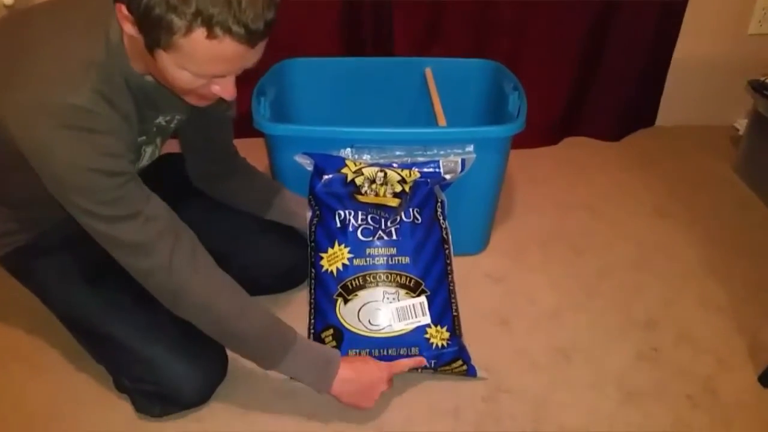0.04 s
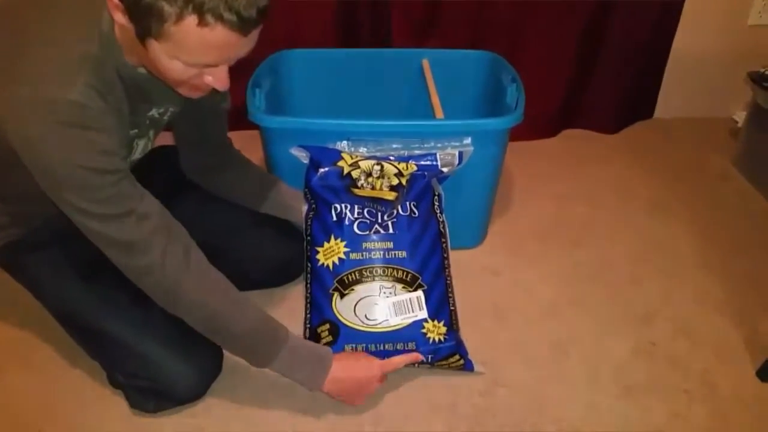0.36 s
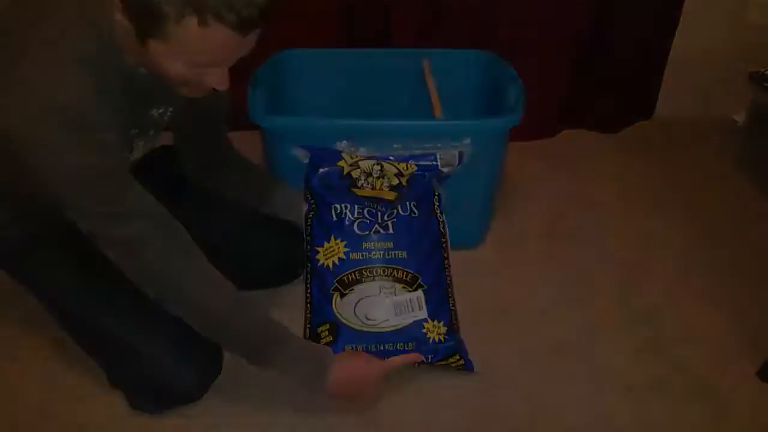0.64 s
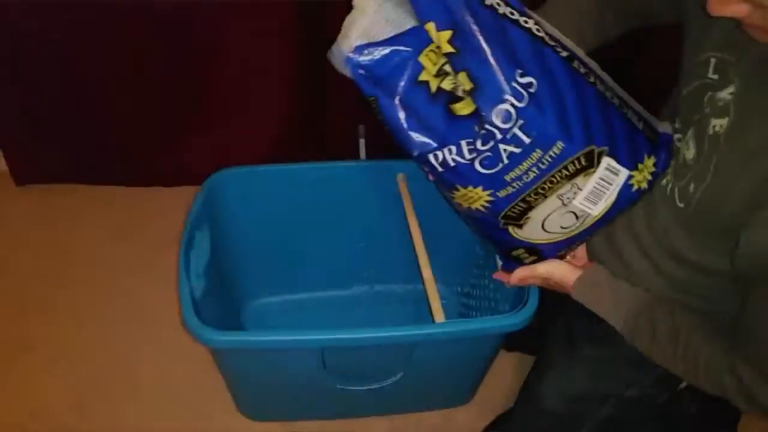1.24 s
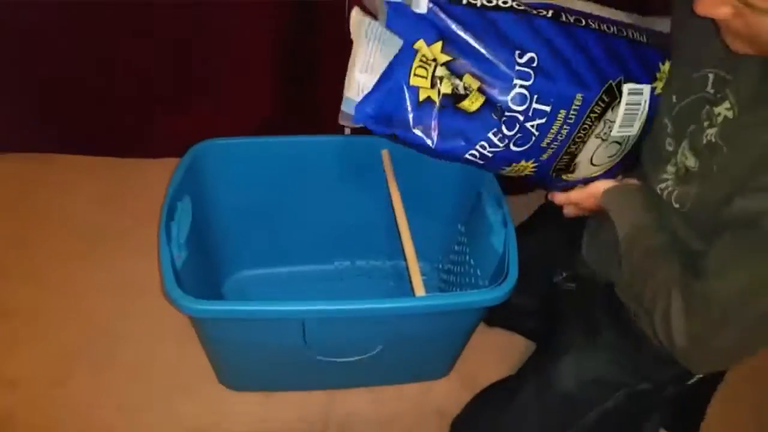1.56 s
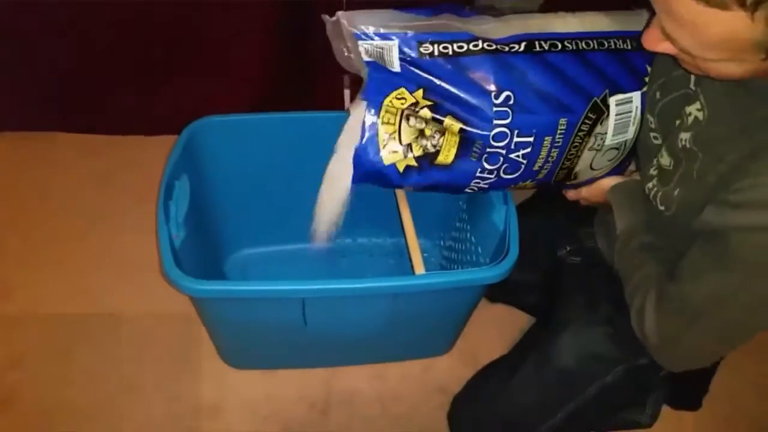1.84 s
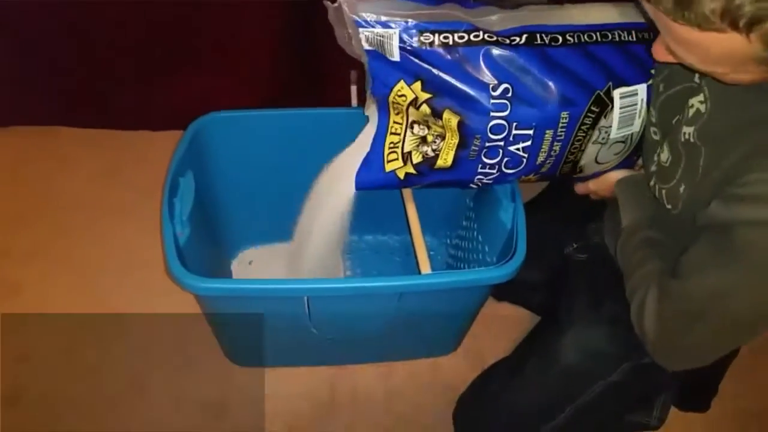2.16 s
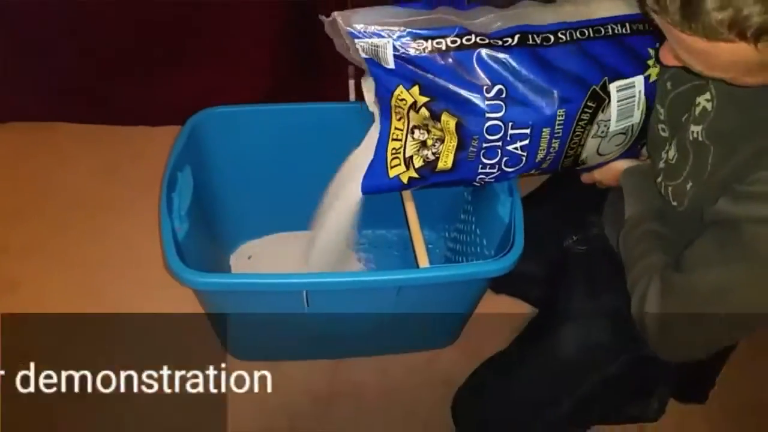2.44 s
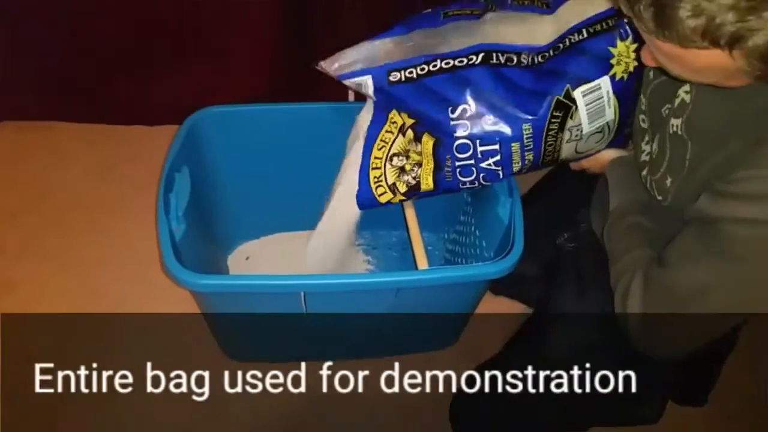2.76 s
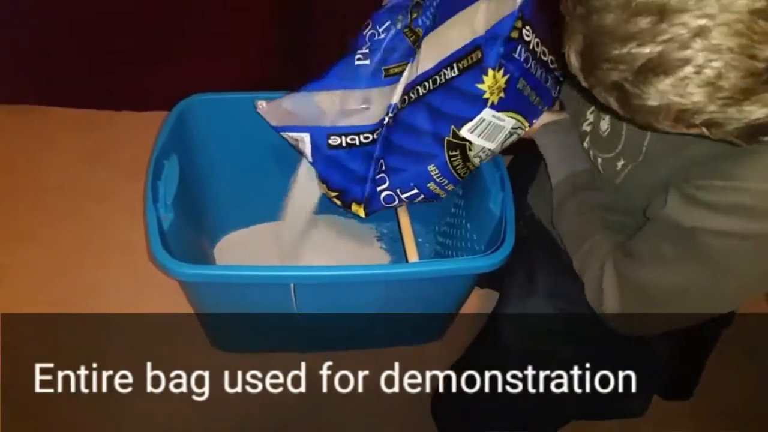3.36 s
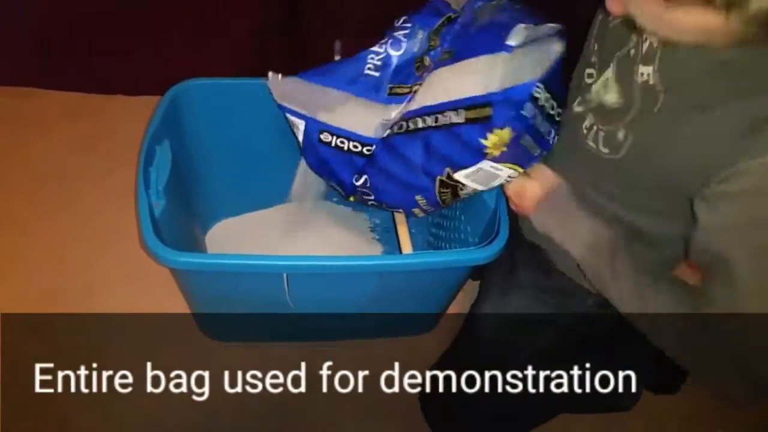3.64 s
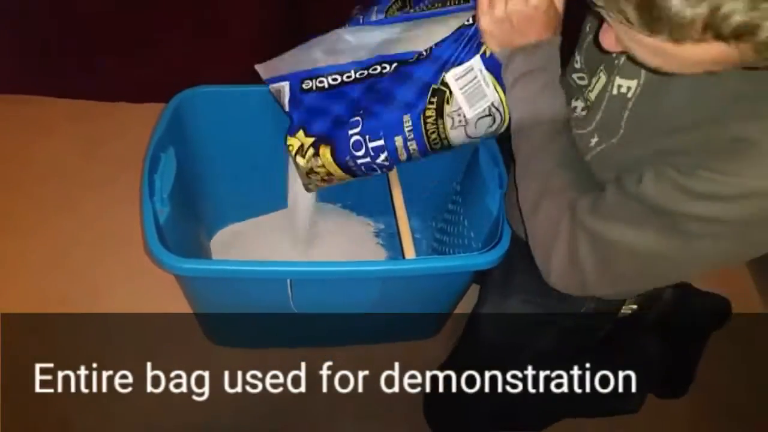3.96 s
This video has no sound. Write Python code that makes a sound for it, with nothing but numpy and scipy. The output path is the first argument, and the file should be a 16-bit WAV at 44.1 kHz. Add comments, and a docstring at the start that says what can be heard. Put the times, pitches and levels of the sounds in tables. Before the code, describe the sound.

Granular litter streams into a plastic tub, hissing and pattering, as its bag crinkles.

```python
"""A low rumble and soft knocks: fingers hold and bump a hand-held recorder in a carpeted room.
A plastic bag crinkles, and cat litter slides twice inside it as it tilts.
The litter streams into a plastic tub, hissing, pattering and drumming on the bare floor until a heap
damps it. After one more slide, the bag crinkles in bursts of snaps as it is shaken empty."""
import sys
import numpy as np
from scipy import signal
from scipy.fft import rfft, irfft
from scipy.io import wavfile
from scipy.ndimage import uniform_filter1d

SR = 44100
rng = np.random.default_rng(int(sys.argv[2]) if len(sys.argv) > 2 else 0)


def wav_out(sig):
    """Save sig, one row per channel (or a flat mono array), as 16-bit PCM at SR to the path in sys.argv[1]."""
    wavfile.write(sys.argv[1], SR, np.round(np.clip(np.atleast_2d(sig).T, -1, 1) * 32767).astype(np.int16))


N = 176400
T = np.arange(N) / SR
GRAINS_PER_S, GRAIN_SPREAD_DB = 29000, 3


def amp(db):
    """dB to gain."""
    return 10 ** (np.asarray(db) / 20)


def unit(x):
    """Scale to rms 1."""
    return x / np.sqrt(np.mean(x ** 2) + 1e-20)


def curve(rows, column=1):
    """Gain over time from a dB column; silent before the first row."""
    rows = np.array(rows)
    return amp(np.interp(T, rows[:, 0], rows[:, column])) * (T >= rows[0, 0])


def read(rows, hz, column=1):
    """Interpolate a column over log frequency."""
    rows = np.array(rows)
    return np.interp(np.log(hz + 1), np.log(rows[:, 0] + 1), rows[:, column])


def colour(x, rows, column=1, size=4096):
    """Minimum-phase filter with the given spectrum."""
    log_gain = np.log(amp(read(rows, abs(np.fft.fftfreq(size, 1 / SR)), column)))
    taps = np.fft.ifft(np.exp(np.conj(signal.hilbert(log_gain)))).real[:size // 2]
    return signal.oaconvolve(x, taps[None], axes=1)[:, :x.shape[1]]


def grains(per_s, spread_db, size=N, mic_jitter_s=0.00007):
    """Tiny random impacts, each slightly early or late at the right microphone."""
    hits = (rng.random(size) < per_s / SR) * rng.choice([-1., 1.], size)
    hits *= amp(spread_db * np.minimum(rng.exponential(1, size), 5))
    arrival = np.arange(size) + np.round(rng.standard_normal(size) * mic_jitter_s * SR).astype(int)
    return unit(np.array([hits, np.bincount(arrival % size, hits, size)]))


def noise(spectrum):
    """Coloured stereo noise, rms 1."""
    return unit(colour(rng.standard_normal((2, N)), spectrum))


def grip(right_db=-8):
    """The holding hand rumbles, mostly on the left microphone."""
    # rumble spectrum: (frequency [Hz], level [dB])
    spectrum = [(20, -16.5), (60, 1), (110, -0.5), (200, -4.5), (330, -16.5), (500, -28.5), (1200, -62.5)]
    # rumble envelope: (time [s], level [dB])
    envelope = [(0, -51.5), (.07, -70), (.23, -65.5), (.3, -74), (.72, -79), (.86, -63), (.97, -70),
                (1.05, -53), (1.15, -65.5), (1.31, -63.5), (1.42, -55), (1.56, -61.5), (1.8, -63),
                (3.3, -63), (3.55, -48), (3.72, -74), (4.0, -48)]
    return noise(spectrum) * curve(envelope) * amp([[0], [right_db]])


def room_tone(left_db=-71, right_db=-75):
    """Steady low rumble and thin hiss; faint airy hiss at the start."""
    # steady spectrum: (frequency [Hz], level [dB])
    tone = [(20, -20), (35, 12.5), (110, -1), (200, -7.5), (350, -8.5), (460, -27), (700, -27.5),
            (3200, -43.5), (3800, -23.5), (4500, -41.5), (12000, -50.5)]
    # airy spectrum: (frequency [Hz], level [dB])
    air = [(200, 8), (700, -3), (2000, -8.5), (3000, -13.5), (4200, -10), (5500, -22), (12000, -19.5)]
    # airy envelope: (time [s], level [dB])
    air_envelope = [(0, -75), (.08, -83.5), (.38, -85.5), (.45, -110)]
    return noise(tone) * amp([[left_db], [right_db]]) + noise(air) * curve(air_envelope)


def finger_bumps(bass_cut_hz=81):
    """A pressure push on one microphone swings back through its bass cut; slow pushes are rounder."""
    # finger contacts: (time [s], peak [dB], nominal rise [ms], left minus right [dB])
    bumps = [(.219, -51, 2.6, 25), (0.236, -53, 2.5, 12), (.325, -54.5, 1.9, 22), (.369, -47, 2.5, 38),
             (.537, -35, 2.25, 31), (0.623, -46, 2.8, -15), (0.796, -41, 2.45, 27), (0.836, -48.5, 3.2, 13),
             (0.926, -41.5, 3.2, 23), (1.459, -29, 2.13, 25), (1.48, -42, 2.4, 17), (1.497, -44, 2.7, 20),
             (1.520, -39.5, 2, 32), (1.622, -37.5, 3.4, 30), (1.7094, -23.5, 1.63, 28),
             (2.243, -44, 3.7, 29), (3.142, -37, 2.9, 19), (3.395, -11.5, 0.53, 35), (3.527, -28.5, 2, 23),
             (3.5819, -21, 0.78, 33), (3.6252, -26, 1.4, 32)]
    out, t = np.zeros((2, N)), T[:SR // 12]
    bass_cut = signal.butter(2, bass_cut_hz, "high", fs=SR)
    for time_s, peak_db, rise_ms, side_db in bumps:
        roundness = 1 + 0.5 * rise_ms ** 2
        peak_s = rise_ms / 1000 * np.sqrt(roundness / 2)
        push = -(t / peak_s * np.exp(1 - t / peak_s)) ** roundness
        swing = signal.lfilter(*bass_cut, push)
        gains = amp(peak_db + np.minimum([[side_db], [-side_db]], 0))
        add(out, time_s - peak_s, gains * swing / abs(swing).max())
    return out


def bag_crinkles(attack_share=0.15, release_s=0.0047):
    """Each fold gives way in a burst of snaps, with a dull thud as the load shifts."""
    # folds: (time [s], length [s], crackle [dB], brightening at 8 kHz [dB], thud [dB])
    folds = [(0.875, 0.016, -83, -10, -78.5), (0.943, 0.0075, -76.5, -15, -83),
             (1.02, 0.037, -74, -17, -66), (1.088, 0.0081, -59, -25, -60), (1.109, 0.0076, -40, -10, -51),
             (1.3281, 0.0053, -45, -1, -38.5), (1.342, 0.046, -59.5, -14, -51),
             (1.397, 0.027, -55.5, -12, -46), (1.474, 0.065, -71, -8, -61), (2.436, 0.023, -42.5, -30, -52),
             (2.624, 0.011, -52, 6, -40), (2.928, 0.019, -38.5, -16, -42), (2.96, 0.015, -40, 10.5, -36.5),
             (3.073, 0.01, -39, -2, -64), (3.332, 0.013, -52, -8, -41), (3.487, 0.091, -46.5, 3, -43.5),
             (3.543, 0.0073, -24.5, 0, -30), (3.636, 0.0034, -33.5, -55, -41), (3.67, 0.027, -52.5, 0, -46),
             (3.733, 0.018, -38, -3, -44.5), (3.758, 0.0084, -29.5, -23, -40),
             (3.773, 0.014, -41.5, 13, -56), (3.803, 0.0025, -22.5, -2, -30), (3.812, 0.03, -40, -3, -41.5),
             (3.841, 0.011, -32, 7, -43), (3.873, 0.017, -34.5, -5, -35), (3.899, 0.017, -36.5, -5, -36),
             (3.954, 0.0099, -39.5, 4, -65)]
    # plastic film spectrum: (frequency [Hz], level [dB])
    film = [(60, -6.5), (250, 0), (600, 2), (1100, 6.5), (1800, 4.5), (2700, -4.5), (4100, 0.5),
            (5400, -10.5), (7500, -0.5), (10000, -5.5), (11700, -26.5)]
    # thud spectrum: (frequency [Hz], level [dB])
    sag = [(30, -25), (90, -0.5), (180, 10.5), (340, 5), (480, -9.5), (700, -2.5), (1500, -33), (4000, -59)]
    out, t = np.zeros((2, N)), T[:SR // 7]
    for time_s, length_s, crackle_db, bright_db, thud_db in folds:
        attack = np.minimum(t / (attack_share * length_s), 1)
        decay = np.exp(-np.maximum(t - length_s, 0) / release_s - 0.46 * t / length_s)
        snaps = grains(per_s=9000, spread_db=1.8, size=len(t)) * attack * decay
        crackle = amp(crackle_db) * colour(unit(colour(snaps, film)), [(1800, 0), (8000, bright_db)])
        thud = amp(thud_db) * unit(colour(snaps, sag))
        add(out, time_s, np.sqrt(length_s / t[-1]) * (crackle + thud))
    return out


def litter_slides():
    """Litter slips along the inside of the bag, swelling and settling."""
    # slides: (peak time [s], level [dB], rise [dB/s], fall [dB/s])
    slides = [(1.203, -42, 246, 284), (1.605, -36, 257, 272), (2.844, -37.5, 260, 330)]
    # sliding spectrum: (frequency [Hz], level [dB])
    spectrum = [(80, 4), (400, -7), (540, -7), (750, -11), (1100, -1), (1500, 2.5), (2100, 0.5), (2650, -6),
                (4100, 0.5), (5400, -13.5), (7100, -1), (9000, -7), (10400, -9), (11700, -35)]
    envelope = sum(amp(db - np.maximum(rise * (peak_s - T), fall * (T - peak_s)))
                   for peak_s, db, rise, fall in slides)
    return envelope * unit(colour(grains(GRAINS_PER_S, GRAIN_SPREAD_DB), spectrum))


def clumps(depth_db, cutoff_hz=40):
    """Quick random unevenness of the stream, as a gain."""
    hz = np.fft.rfftfreq(N, 1 / SR)
    flutter = irfft(rfft(rng.standard_normal(N)) / (1 + (hz / cutoff_hz) ** 4), N)
    return amp(depth_db * unit(flutter))


def wall_echo(x, centre_delay_s=0.001417, swing=0.297, drift_hz=2.5, echo_db=-3.5):
    """The tub wall returns the patter; the hollow colour shifts as the stream wanders."""
    out = []
    for side in x:
        sines = [np.sin(2 * np.pi * (drift_hz * rate * T + phase)) for rate, phase in rng.random((8, 2))]
        delay_s = centre_delay_s * np.exp(swing * unit(sum(sines)))
        out.append(side + amp(echo_db) * np.interp(T - delay_s, T, side))
    return np.array(out)


def litter_stream():
    """Grains hiss against each other and patter on the heap."""
    # stream envelope: (time [s], hiss [dB], patter [dB])
    flow = [(.96, -104, -100), (1.1, -100, -63), (1.45, -77, -82), (1.76, -62, -62.5), (1.87, -39.5, -43.5),
            (1.91, -28.5, -38.5), (2.05, -39.5, -42.5), (2.3, -39, -46.5), (2.76, -41, -43.5),
            (2.84, -36.5, -37), (2.89, -31, -43), (2.96, -38, -39), (3.04, -40, -44.5), (3.3, -44.5, -45.5),
            (3.48, -48.5, -49.5), (3.71, -49, -54), (3.78, -44.5, -50.5), (4.0, -41, -45)]
    # grain on grain: (frequency [Hz], level [dB])
    hiss_spectrum = [(300, -53), (1500, -27.5), (2600, -10.5), (3900, 0), (5300, -9.5), (7200, 3),
                     (9800, 0), (11000, -7.5), (11800, -21.5)]
    # grain on heap: (frequency [Hz], level [dB])
    patter_spectrum = [(40, -40), (150, -9), (430, -7), (600, -7), (850, -6), (1200, 5), (1600, 3),
                       (2150, 6), (2650, -5.5), (4000, -3), (9000, -26)]
    hiss = unit(colour(grains(GRAINS_PER_S, GRAIN_SPREAD_DB), hiss_spectrum)) * clumps(depth_db=1.25)
    landings = colour(grains(per_s=7000, spread_db=1.5), patter_spectrum)
    patter = unit(wall_echo(landings)) * clumps(depth_db=1.5)
    return hiss * curve(flow, column=1) + patter * curve(flow, column=2)


def tub_drumming():
    """Falling litter rings the damped plastic floor of the tub."""
    # tub modes: (frequency [Hz], level [dB], t60 [s])
    modes = [(165, -13, 0.14), (206.7, 1, 0.079), (233, -7, 0.042), (306, 2, 0.02), (558, -5, 0.024),
             (655, -9, 0.021)]
    # drumming envelope: (time [s], level [dB])
    envelope = [(1.8, -56), (1.87, -50.5), (1.91, -39), (1.98, -38.5), (2.08, -50.5), (2.3, -55),
                (2.85, -52), (2.96, -64), (3.05, -52.5), (3.7, -52.5), (3.86, -51.5), (4.0, -49)]
    t = T[:SR // 5]
    ring = sum(amp(db - 60 * t / t60_s) * np.sin(2 * np.pi * hz * t) for hz, db, t60_s in modes)
    hits = grains(per_s=900, spread_db=2)
    return unit(signal.oaconvolve(hits, ring[None], axes=1)[:, :N]) * curve(envelope)


def room(x, density=0.06, predelay_s=0.0015):
    """Short reflections from the tub walls and the soft room."""
    # room decay: (frequency [Hz], t60 [s])
    decay = [(150, 0.18), (1000, 0.25), (4000, .2), (11000, 0.34)]
    size = SR // 3
    taps = rng.standard_normal((2, size)) * (rng.random((2, size)) < density) * (T[:size] > predelay_s)
    hz, t, bands = signal.stft(taps, SR, nperseg=256)
    tail = signal.istft(bands * amp(-60 * t / read(decay, hz)[:, None]), SR, nperseg=256)[1]
    tail /= np.linalg.norm(tail, axis=1, keepdims=True)
    return signal.oaconvolve(x, tail, axes=1)[:, :N]


def drifting_room(x, drift_hz=3.065, count=3):
    """Sets of reflections crossfade as the bag and the stream move."""
    fades = [np.cos(np.pi * (drift_hz * T + k / count)) for k in range(count)]
    return sum(room(x * fade) for fade in fades) * np.sqrt(2 / count)


def add(mix, time_s, sound):
    """Mix in a stereo sound."""
    part = mix[:, max(round(time_s * SR), 0):][:, :sound.shape[1]]
    part += sound[:, :part.shape[1]]


def scene(room_db=-7):
    """Litter and bag in the room at two differently coloured microphones, plus handling noise."""
    # microphone responses: (frequency [Hz], left [dB], right [dB])
    mics = [(99, -10, -7.5), (570, 5, 3.5), (1360, -3.2, 0.2), (2270, -3, -1.5), (2500, -3.1, -1.6),
            (4030, -6.5, 2), (5000, -2.5, 4), (6850, -5, 4), (8100, -2.5, -3), (8500, 2.5, -5.5),
            (9830, -1.5, -3.5), (11700, -2, -14)]
    direct = litter_slides() + litter_stream() + tub_drumming() + bag_crinkles()
    heard = amp(-3.5) * (direct + amp(room_db) * drifting_room(direct))
    stereo = np.vstack([colour(heard[:1], mics, column=1), colour(heard[1:], mics, column=2)])
    return stereo + finger_bumps() + grip() + room_tone()


def record(dry, dip_s=(0.389, 0.46), dip_db=-35, cutoff_hz=11850):
    """The level dips briefly near the start; a low-pass cuts the top treble."""
    gate = uniform_filter1d(1. * ((T < dip_s[0]) | (T > dip_s[1])), size=300)
    low_pass = signal.firwin(511, cutoff_hz, window=("kaiser", 8), fs=SR)
    return signal.oaconvolve(dry * np.maximum(gate, amp(dip_db)), low_pass[None], "same")


dry = scene()
out = record(dry)
wav_out(out)
```